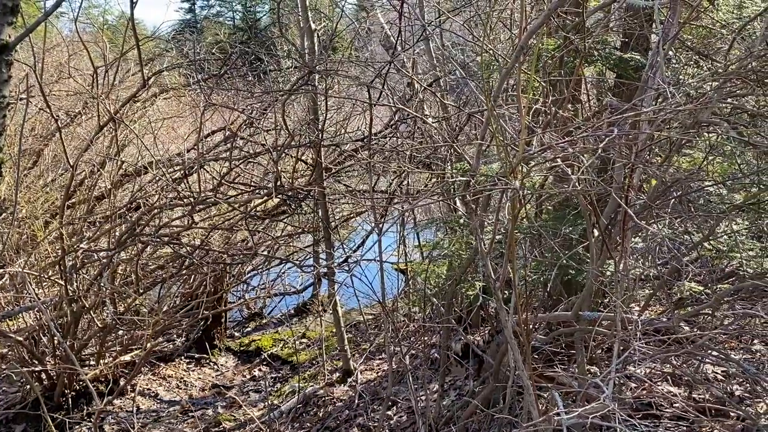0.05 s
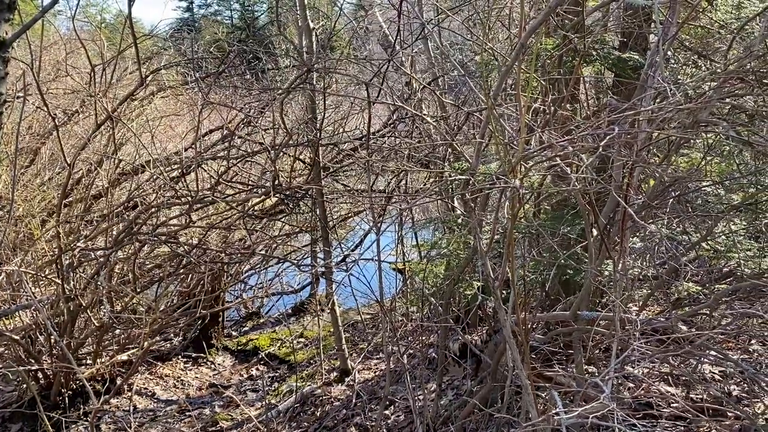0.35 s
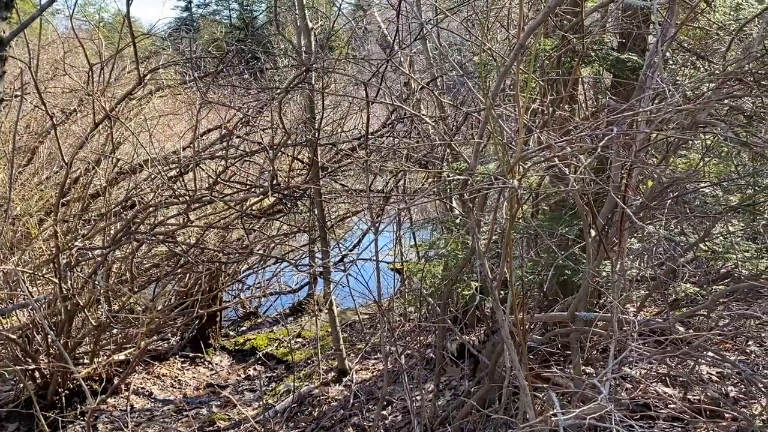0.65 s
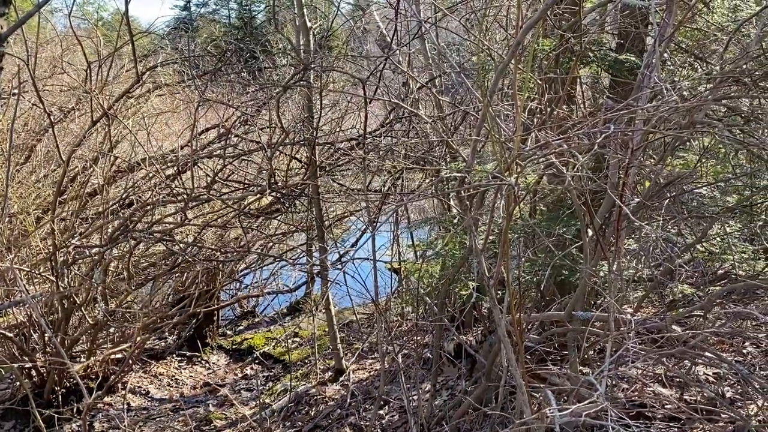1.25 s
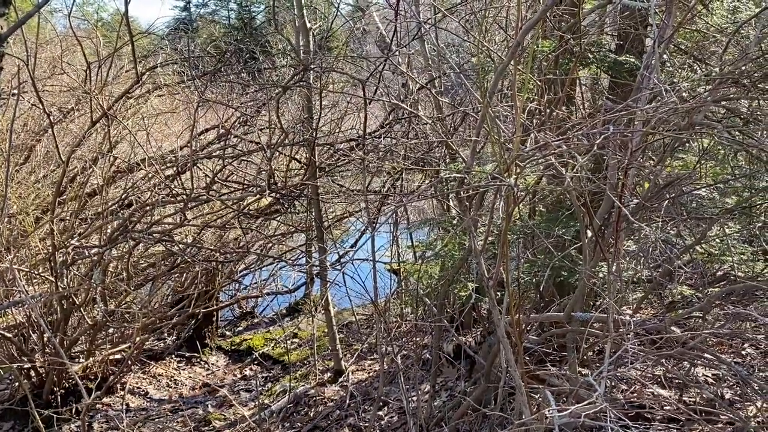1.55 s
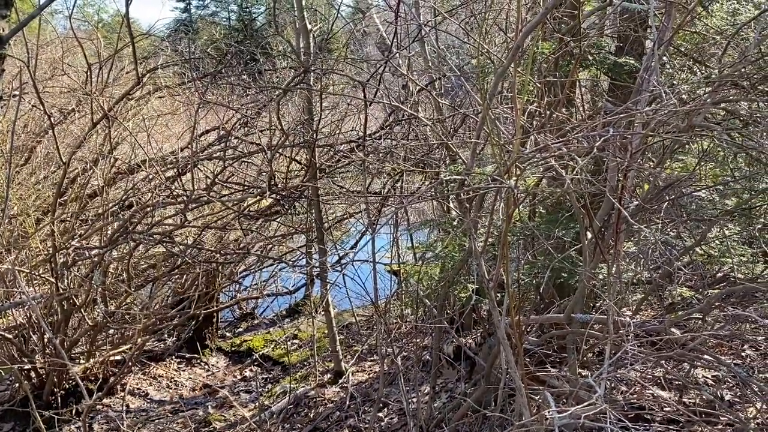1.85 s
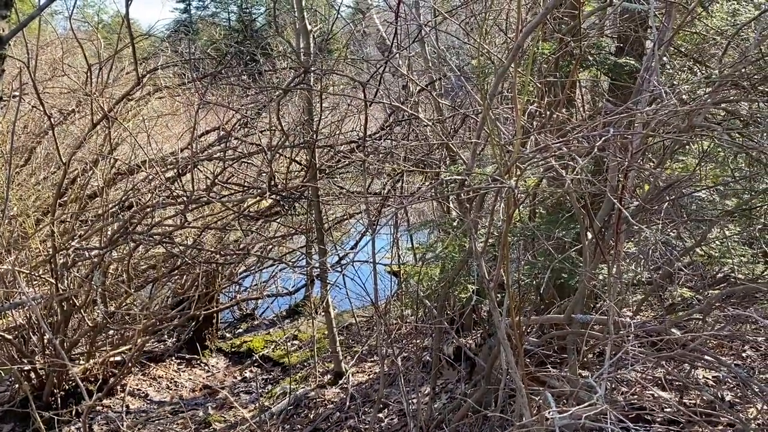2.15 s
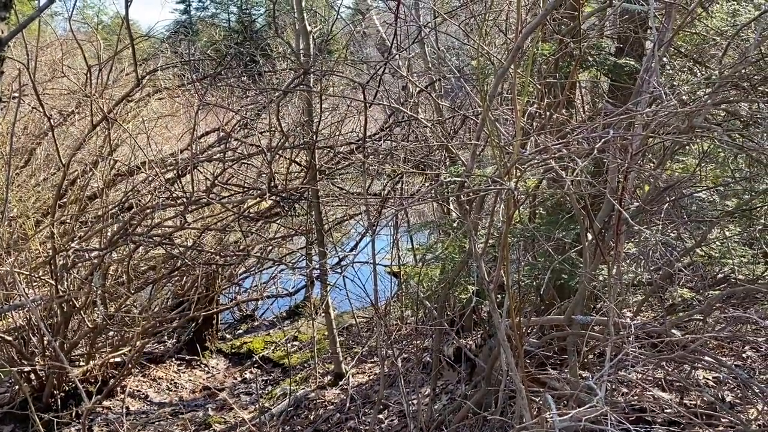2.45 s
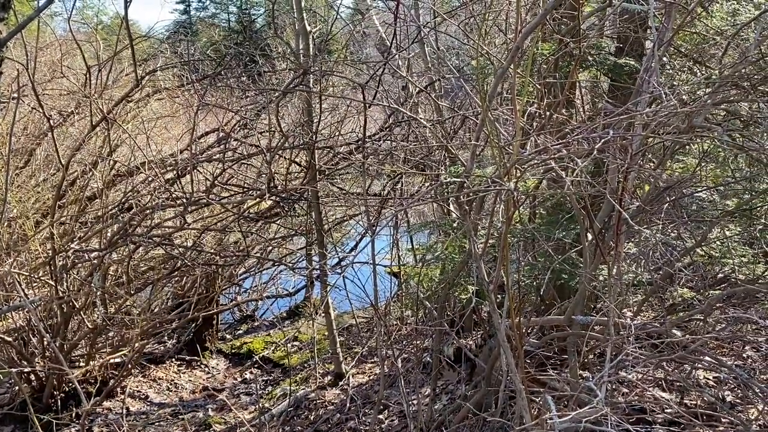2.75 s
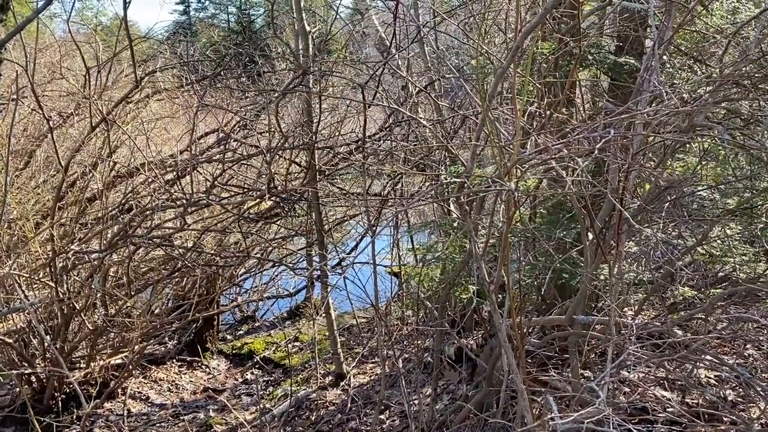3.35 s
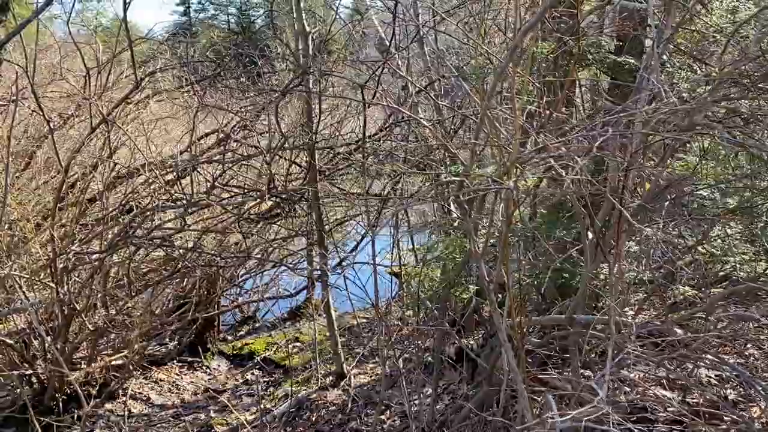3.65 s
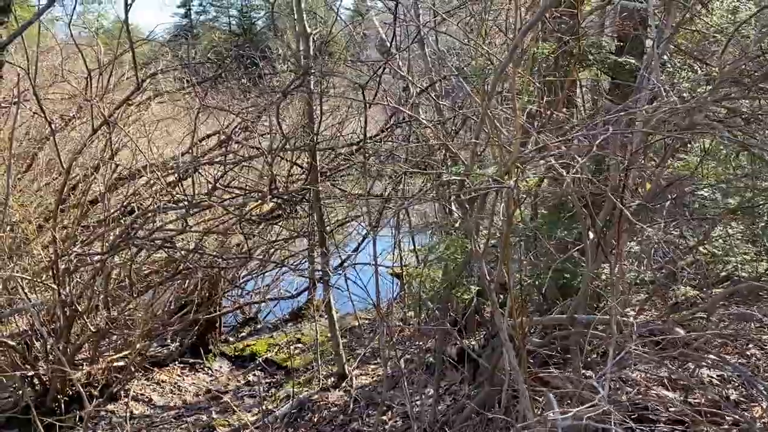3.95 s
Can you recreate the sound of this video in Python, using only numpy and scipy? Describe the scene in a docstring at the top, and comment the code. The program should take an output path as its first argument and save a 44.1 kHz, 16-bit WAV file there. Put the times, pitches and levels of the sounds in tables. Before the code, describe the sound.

Several frogs croak at a small pond behind bushes, their short quacking calls crowding together at first, then coming in looser clusters. Underneath are a quiet hush, light wind on the microphone and faint twig ticks.

```python
"""Frogs quack from a small pond behind bare bushes, over a calm day's hush and a faint, far hoot.
Each croak is a short burst of pulses that rings a throat whose resonances sink as it empties.
The bushes scatter the calls and the wood echoes faintly. Wind rumbles lightly, twigs tick and
dry leaves rustle close by, and near the end the hoot comes again."""
import sys
import numpy as np
from scipy import signal
from scipy.fft import rfft, irfft
from scipy.io import wavfile

SR = 44100
rng = np.random.default_rng(int(sys.argv[2]) if len(sys.argv) > 2 else 0)


def unload_wav(signal):
    """Save mono or channel-first audio to the path in sys.argv[1] as 16-bit WAV at rate SR, clipped to [-1, 1]."""
    wavfile.write(
        sys.argv[1],
        SR,
        np.round(np.clip(np.atleast_2d(signal).T, -1, 1) * 32767).astype(np.int16),
    )


N = 176400  # 4 seconds


def amp(db):
    """Turns decibels into a number to multiply by."""
    return 10 ** (np.asarray(db) / 20)


def evened(x):
    """Scales a sound to an average (rms) level of 1."""
    return x / np.sqrt(np.mean(x ** 2) + 1e-20)


def read(points, hz):
    """Looks up a table between its rows, on a log frequency scale."""
    f, value = np.transpose(points)
    return np.interp(np.log(hz + 1), np.log(f + 1), value)


def add(mix, start_s, sound):
    """Mixes a sound in at its start time."""
    part = mix[:, max(round(start_s * SR), 0):][:, :sound.shape[-1]]
    part += sound[..., :part.shape[1]]


def coloured(x, tone):
    """Turns each frequency up or down as a tone table says."""
    return irfft(rfft(x) * amp(read(tone, np.fft.rfftfreq(N, 1 / SR))), N)


def swells(rows):
    """Makes one smooth hump of loudness for each row."""
    t = np.arange(N) / SR
    return sum(amp(db) * np.exp(-((t - peak) / half) ** 2 / 2) for peak, half, db in rows)


# How alike the air sounds in both ears: (frequency [Hz], likeness [0 to 1])
AIR_LIKENESS = [(40, .95), (250, 0.44), (5000, .1)]
# Tone of the hush: (frequency [Hz], gain [dB])
HUSH_TONE = [(25, -13.5), (52, -2), (80, -0.5), (150, -6.5), (300, -7.5), (500, -12.5), (800, -2.5),
             (1050, -10), (1500, -10.5), (3200, -36), (7000, -44), (12000, -48.5), (13500, -62)]
# Puffs of wind on the microphone: (peak time [s], half length [s], level [dB])
WIND_PUFFS = [(.16, 0.044, -56), (1.14, 0.021, -65), (1.5, 0.018, -56.5), (3.09, 0.035, -53)]
# Deep tone of the puffs: (frequency [Hz], gain [dB])
WIND_TONE = [(20, -16), (55, -5), (130, -10), (1000, -71.5)]


def air(hush_db=-59.5):
    """Outdoor air makes a steady hush, with a few low puffs of wind."""
    left, other = rfft(rng.standard_normal((2, N)))
    likeness = read(AIR_LIKENESS, np.fft.rfftfreq(N, 1 / SR))
    right = likeness * left + np.sqrt(1 - likeness ** 2) * other
    noise = irfft(np.array([left, right]), N)
    hush = amp(hush_db) * evened(coloured(noise, HUSH_TONE))
    wind = swells(WIND_PUFFS) * evened(coloured(noise[::, ::-1], WIND_TONE))  # same noise, backwards
    return hush + wind


# Far hoots: (start [s], length [s], starting pitch [Hz], level [dB])
FAR_HOOTS = [(0.028, 0.14, 454, -59), (3.36, 0.12, 432, -55.5)]


def hoots(pitch_drop=.11):
    """Something far off hoots: a pure tone swells and fades as its pitch falls."""
    out = np.zeros((2, N))
    for start, length, hz, db in FAR_HOOTS:
        age = np.arange(0, length, 1 / SR) / length
        cycles = np.cumsum(hz * (1 - pitch_drop * age)) / SR
        add(out, start, amp(db) * np.sin(np.pi * age) * np.sin(2 * np.pi * cycles))
    return out


def throat_ring(hz, width_hz):
    """One pulse rings a resonance, a note the throat favours. A wider one dies away sooner."""
    t = np.arange(320) / SR
    swell = np.pi * width_hz * t
    return swell * np.exp(1 - swell) * np.sin(2 * np.pi * hz * t)


# High throat resonances that add rasp: (frequency [Hz], width [Hz], gain on top of the rasp [dB])
RASP_RINGS = [(2030, 222, 11), (2587, 400, 4), (3337, 350, -7), (4796, 350, 0)]
SLOW_START, SPEED_UP_S, SAG_PER_S = .3, .006, 5.0  # the pulses start slow, speed up, then slow again
RISE_DB, RISE_SHAPE, FALL_DB, FALL_SHAPE = 12, 1.16, 20, 1.334
THROAT_START, THROAT_SINK = 1.099, 0.25  # as shares of the throat note
LOW_RATIO, LOW_CAP_DB, LOW_GROWTH_DB = 0.6194, -3, 8.0  # the low ring stays under the main one
JITTER_S, SHIMMER_DB, TRIM_DB = .00004, 3.98, -0.64  # uneven timing, uneven strength, overall trim


def croak(rise, fall, level_db, rate, throat_hz, low_db, rasp_db):
    """A burst of pulses rings the throat, whose resonances sink as it empties."""
    t = np.arange(0, rise + fall * 1.3, 1 / SR)
    pulse_rate = rate * (1 - SLOW_START * np.exp(-t / SPEED_UP_S)) * np.exp(-SAG_PER_S * t)
    pulse_count = np.floor(np.cumsum(pulse_rate) / SR)
    pulse_s = t[np.diff(pulse_count, prepend=-1) > 0][:64, None]  # one row for each pulse
    chance = rng.standard_normal((64, 8))[:len(pulse_s), :, None]
    fade_in_db = RISE_DB * np.maximum(1 - pulse_s / rise, 0) ** RISE_SHAPE
    fade_out_db = FALL_DB * (np.maximum(pulse_s - rise, 0) / fall) ** FALL_SHAPE
    strength = amp(level_db + TRIM_DB - fade_in_db - fade_out_db + SHIMMER_DB * chance[:, 0])
    age = pulse_s / (rise + fall)
    main_hz = throat_hz * (THROAT_START - THROAT_SINK * age)
    low_gain = amp(min(low_db, LOW_CAP_DB) + LOW_GROWTH_DB * (age - 1.5))
    rings = throat_ring(main_hz, width_hz=454)
    rings += low_gain * throat_ring(main_hz * LOW_RATIO, width_hz=185)
    for k, (hz, width, db) in enumerate(RASP_RINGS):
        wander = 1 + 0.12 * chance[:, k + 2] - 0.055 * (age - .5)
        rings += amp(rasp_db + db) * throat_ring(hz * wander, width)
    starts = np.maximum(np.round((pulse_s + JITTER_S * chance[:, 1]) * SR), 0).astype(int)
    samples = starts + np.arange(rings.shape[1])
    return np.bincount(samples.ravel(), (strength * rings).ravel())  # adds up overlapping rings


# Near croaks, as base values that croak() then bends: (start [s], rise [s], fall [s], level [dB],
# pulse rate [per s], throat note [Hz], low ring [dB], rasp [dB])
NEAR_CROAKS = [(0.0374, 0.023, 0.011, -31.5, 590, 1580, -7, -26.5),
               (0.0961, 0.011, 0.046, -40.5, 270, 1660, -5, -23.5),
               (0.1544, 0.018, 0.021, -34, 303, 1350, -7, -30),
               (0.1921, 0.013, 0.05, -36, 445, 1210, -4.5, -25.5),
               (0.2266, 0.0096, 0.028, -29.5, 510, 1550, -7, -27.5),
               (0.2619, 0.0035, 0.034, -38.5, 198, 1233, -3, -44),
               (0.3096, 0.015, 0.012, -34.5, 460, 1434, -8.5, -35.5),
               (0.3491, 0.0039, 0.044, -33, 330, 1437, -1, -28),
               (0.4137, 0.0082, 0.018, -40, 341, 1146, -4, -32.5),
               (0.4527, 0.019, 0.015, -30.5, 440, 1370, -12, -31.5),
               (0.5582, 0.019, 0.048, -44.5, 370, 1320, -1.5, -30.5),
               (0.6073, 0.0026, 0.027, -31, 260, 1445, -9.5, -42),
               (0.6381, 0.013, 0.012, -32.5, 290, 1327, -14, -31.5),
               (0.7125, 0.031, 0.05, -38.5, 280, 1162, -11.5, -39),
               (0.747, 0.02, 0.04, -35, 410, 1515, -4.5, -36),
               (0.7915, 0.01, 0.012, -32, 406, 1580, -9, -38),
               (0.8367, 0.016, 0.014, -33, 298, 1450, -10.5, -28),
               (0.9826, 0.0025, 0.048, -36.5, 260, 1253, -10, -38.5),
               (1.0126, 0.02, 0.041, -32, 445, 1294, -12.5, -32),
               (1.0446, 0.0027, 0.029, -35, 433, 1435, -11.5, -23.5),
               (1.0622, 0.0042, 0.024, -32, 464, 1410, -9, -35.5),
               (1.098, 0.0064, 0.021, -41, 330, 1630, 6, -24.5),
               (1.1662, 0.0099, 0.03, -40, 160, 1314, 1, -32.5),
               (1.224, 0.0088, 0.064, -34, 287, 1413, -3, -36.5),
               (1.2843, 0.011, 0.055, -40, 414, 1390, -4.5, -28),
               (1.3363, 0.0052, 0.02, -28, 540, 1370, -12.5, -33),
               (1.3831, 0.014, 0.018, -29.5, 211, 1267, -4.5, -30.5),
               (1.4277, 0.012, 0.013, -28.5, 500, 1394, -4.5, -36),
               (1.5772, 0.0051, 0.012, -42.5, 428, 1192, -1, -51),
               (1.7436, 0.0074, 0.027, -42.5, 439, 1430, -4, -21.5),
               (1.813, 0.0016, 0.045, -36, 432, 1300, 1, -33.5),
               (1.9193, 0.012, 0.034, -27.5, 280, 1445, -7, -28),
               (2.0003, 0.0034, 0.01, -27.5, 374, 1350, -8.5, -32),
               (1.9978, 0.016, 0.042, -37.5, 476, 1540, -8, -25.5),
               (2.0484, 0.0028, 0.037, -37.5, 465, 1320, -7, -32.5),
               (2.0748, 0.0079, 0.011, -32, 250, 1460, -13, -37.5),
               (2.0872, 0.017, 0.014, -38, 491, 1330, -8, -25),
               (2.1811, 0.015, 0.005, -37, 217, 1250, -6, -32),
               (2.2315, 0.0091, 0.034, -31.5, 462, 1424, -8, -31),
               (2.2808, 0.0095, 0.032, -36, 466, 1356, -5, -36.5),
               (2.3473, 0.0076, 0.014, -31.0, 375, 1455, -7, -29),
               (2.3935, 0.0094, 0.016, -45, 431, 1260, -4, -39.5),
               (2.5603, 0.003, 0.023, -37.5, 270, 1260, -5, -39.5),
               (2.607, 0.008, 0.036, -35, 430, 1333, -9, -41.5),
               (2.6345, 0.0036, 0.021, -33.5, 303, 1430, -16.5, -33),
               (2.8376, 0.0022, 0.017, -28.5, 335, 1500, -9, -32),
               (2.8931, 0.003, 0.03, -32, 327, 1320, 6, -29),
               (2.9258, 0.002, 0.039, -27.5, 299, 1414, -12, -34),
               (2.9596, 0.011, 0.025, -33, 260, 1200, -12, -35),
               (2.9712, 0.0076, 0.03, -35, 277, 1315, -4, -19),
               (2.9833, 0.018, 0.014, -29.5, 428, 1500, -9, -33),
               (3.1825, 0.012, 0.033, -33, 472, 1367, -9, -43.5),
               (3.2503, 0.016, 0.026, -31, 407, 1357, -13.5, -37),
               (3.4838, 0.0056, 0.031, -33, 473, 1276, -4.5, -34),
               (3.5539, 0.0031, 0.028, -32.5, 320, 1470, -9, -37),
               (3.6694, 0.009, 0.033, -33.4, 442, 1417, -7, -32.5),
               (3.6831, 0.021, 0.067, -39.2, 190, 1230, -1.5, -24.5),
               (3.7408, 0.018, 0.036, -27.5, 498, 1590, -16.5, -30),
               (3.7688, 0.011, 0.012, -27, 500, 1287, -9, -30),
               (3.7978, 0.004, 0.034, -42.5, 330, 1460, -12.5, -31),
               (3.8322, 0.012, 0.012, -33.5, 384, 1607, -6, -40)]
# Tone shared by all the frogs: (frequency [Hz], gain [dB])
FROG_TONE = [(100, -10), (450, -8), (620, 11), (820, 8), (1080, 2), (1500, 0.5), (3000, 0), (5200, 0),
             (6500, -12.5), (9000, -25)]
FAR_CROAKS, FAR_DB, FAR_SPREAD_DB = 40, -52.5, 1  # frogs at the far bank
PAN_SPREAD_DB, LEAN_RIGHT_DB, DELAY_SPREAD_S = 0.5, .4, .00006


def frogs():
    """Near frogs call over a fainter random chorus, each croak from its own spot on the pond."""
    out = np.zeros((2, N))
    chorus = []
    for start in rng.uniform(0, N / SR, FAR_CROAKS):
        db = FAR_DB - FAR_SPREAD_DB * rng.standard_normal()
        rate, throat_hz = rng.uniform(250, 470), rng.uniform(1150, 1363)
        chorus.append((start, .014, .025, db, rate, throat_hz, 0, -36))
    for start, *shape in list(NEAR_CROAKS) + chorus:
        sound, spot = croak(*shape), rng.standard_normal()
        for ear, side in enumerate((-.5, .5)):  # left, then right
            gain = amp(side * (spot * PAN_SPREAD_DB + LEAN_RIGHT_DB))
            add(out[ear:ear + 1], start + side * spot * DELAY_SPREAD_S, gain * sound)
    return coloured(out, FROG_TONE)


def echoes(x, fade_times):
    """Sound bounces off stems and trunks, reaching each ear by different paths."""
    bounces = rng.standard_normal((2, SR)) * (rng.random((2, SR)) < .1)
    bounces[:, :60] = 0  # a tiny wait before the first bounce
    hz, t, bands = signal.stft(bounces, SR, nperseg=128)
    fade = amp(-60 * t / read(fade_times, hz)[:, None])
    tail = signal.istft(bands * fade, SR, nperseg=128)[1]
    voice_band = abs(rfft(tail, SR)[:, 600:2000])  # 600 to 2000 Hz, where the frogs are loudest
    tail /= np.sqrt((voice_band ** 2).mean(1, keepdims=True))
    return signal.fftconvolve(x, tail, axes=1)[:, :N]


# Quick echoes in the bushes: (frequency [Hz], time to fade by 60 dB [s])
BUSH_FADE = [(1500, 0.084), (5000, 0.2)]
# Longer echoes in the wood: (frequency [Hz], time to fade by 60 dB [s])
WOOD_FADE = [(1000, 0.39), (6000, 0.59)]


def bushes_and_wood(calls, bush_db=-9, wood_db=-14):
    """The bushes scatter the calls along shifting paths, and the wood adds a faint tail."""
    t = np.arange(N) / SR
    paths = [np.sqrt(2 / 3) * np.cos(2 * np.pi * (t + k / 3)) for k in range(3)]  # they take turns
    bushes = sum(share * echoes(calls, BUSH_FADE) for share in paths)
    return amp(bush_db) * bushes + amp(wood_db) * echoes(calls, WOOD_FADE)


# Ticking twigs: (time [s], base level [dB])
TWIG_TICKS = [(0.2498, -61), (0.856, -68.5), (1.1553, -78), (2.1176, -58.5), (2.2877, -67), (3.329, -77.5),
              (3.783, -66.5)]
# Bright tone of a tick: (frequency [Hz], gain [dB])
TWIG_TONE = [(500, -24), (3500, -2.5), (7500, -0.5), (9500, -21.5), (15000, -13.5)]


def twigs(tick_fade_s=0.019, tail_fade_s=.16, tail_db=-4):
    """Each twig gives a sharp tick of noise with a short scattered tail."""
    out, t = np.zeros((2, N)), np.arange(SR // 5) / SR
    fade = amp(-60 * t / tick_fade_s) + amp(tail_db - 60 * t / tail_fade_s)
    for start, db in TWIG_TICKS:
        add(out, start, 2 * amp(db) * fade * rng.standard_normal((2, len(t))))
    return coloured(out, TWIG_TONE)


# Rustling leaves: (peak time [s], half length [s], level [dB])
LEAF_RUSTLES = [(.61, 0.031, -64.5), (.9, 0.063, -74), (1.06, 0.031, -81), (2.19, 0.072, -77),
                (4.0, 0.062, -73)]
# Crisp tone of the leaves: (frequency [Hz], gain [dB])
LEAF_TONE = [(300, -32), (2000, 2), (4200, 2), (7000, 3.5), (9000, -23), (11500, -9), (14000, -37.5)]


def leaves(size_spread_db=2.5):
    """Dry leaves make many tiny crackles that blur into a rustle."""
    crackles = rng.standard_normal((2, N))
    crackles *= amp(size_spread_db * np.minimum(rng.exponential(1, N), 5))  # a few stand out
    crackles *= rng.random(N) < .15  # gaps between them
    return swells(LEAF_RUSTLES) * evened(coloured(crackles, LEAF_TONE))


def scene():
    """Mixes the calls and their echoes with the air, leaves and twigs."""
    calls = hoots() + frogs()
    return calls + bushes_and_wood(calls) + air() + leaves() + twigs()


def record(dry, cutoff_hz=15500):
    """Cuts away the very highest treble."""
    low_pass = signal.firwin(511, cutoff_hz, window=("kaiser", 9), fs=SR)
    return signal.oaconvolve(dry, low_pass[None], "same")


dry = scene()
out = record(dry)
unload_wav(out)
```